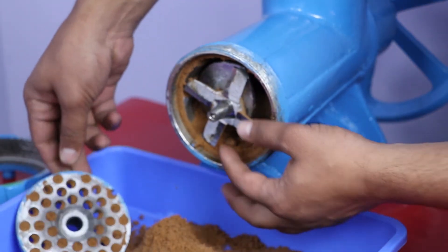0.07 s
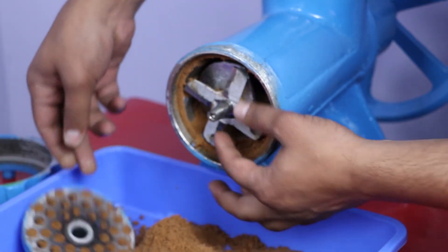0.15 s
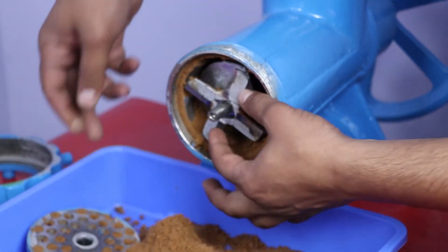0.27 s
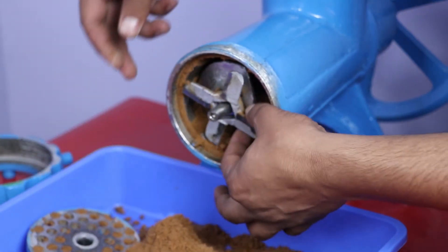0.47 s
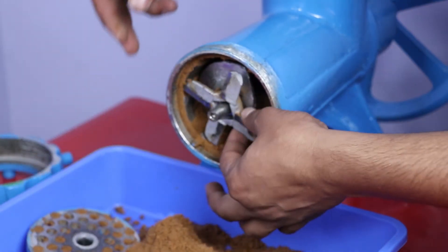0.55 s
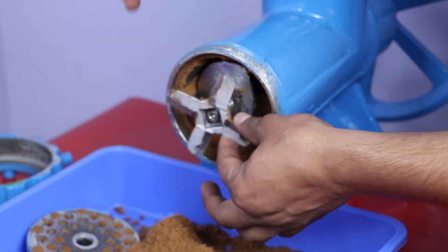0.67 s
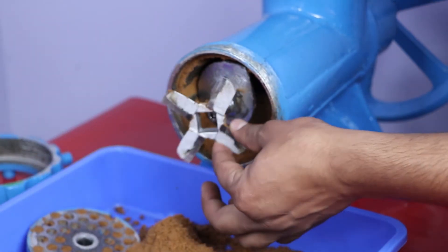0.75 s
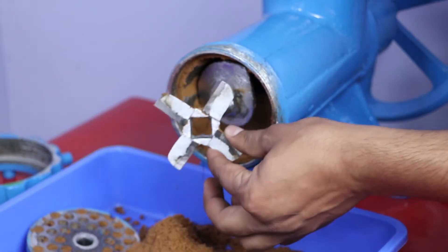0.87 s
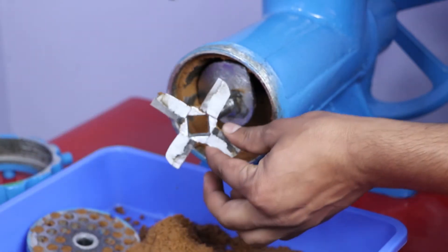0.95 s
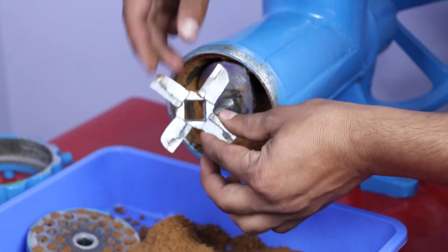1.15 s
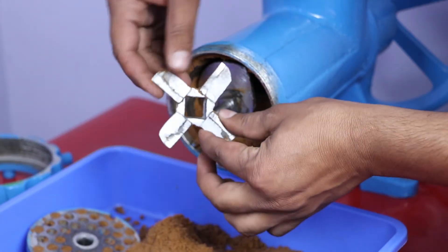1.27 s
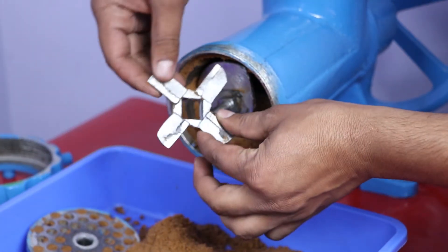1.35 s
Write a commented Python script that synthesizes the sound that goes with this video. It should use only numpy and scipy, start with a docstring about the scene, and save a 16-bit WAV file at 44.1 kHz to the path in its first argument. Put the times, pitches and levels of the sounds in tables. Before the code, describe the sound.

A steel grinder plate scrapes down a gritty plastic tub and lands with a hollow, booming thump. Crumbs settle, then a small blade clinks softly as it is worked loose, in a small, hard room with faint hiss.

```python
"""A meat grinder is taken apart in a small, hard room, over a faint hiss. First its perforated steel
plate scrapes down the gritty wall of a plastic tub, which rings faintly. Then the plate lands with
a hollow thump that booms on in the tub and the room. Crumbs settle, and last the cross knife
clinks softly as it is worked off its shaft."""
import sys
import numpy as np
from scipy import signal
from scipy.fft import rfft, irfft, next_fast_len
from scipy.io import wavfile
from scipy.ndimage import map_coordinates

SR = 44100
rng = np.random.default_rng(int(sys.argv[2]) if len(sys.argv) > 2 else 0)


def unload_wav(signal):
    """Save mono or channel-first audio to the path in sys.argv[1] as 16-bit WAV at rate SR, clipped to [-1, 1]."""
    wavfile.write(
        sys.argv[1],
        SR,
        np.round(np.clip(np.atleast_2d(signal).T, -1, 1) * 32767).astype(np.int16),
    )


N = 61739  # samples, 1.4 s


def amp(db):
    """Turn decibels into a number to multiply by."""
    return 10 ** (np.asarray(db) / 20)


def unit(x):
    """Scale x to an average (rms) strength of 1."""
    return x / np.sqrt(np.mean(x ** 2) + 1e-20)


def along(points, hz):
    """Read the value at hz from a curve through (frequency, value) points, on a log frequency axis."""
    freqs, values = np.transpose(points)
    return np.interp(np.log(hz + 1), np.log(freqs + 1), values)


def since(start):
    """Seconds since the start time, zero before it."""
    return np.maximum(np.arange(N) / SR - start, 0)


def fade(start, t60):
    """Hold at 1 until the start time, then fall by 60 dB every t60 seconds."""
    return amp(-60 * since(start) / t60)


def rise(start, rise_s):
    """Stay at 0 until the start time, then climb smoothly towards 1."""
    return 1 - np.exp(-since(start) / rise_s)


def filtered(x, response):
    """Multiply each frequency in x by response(hz)."""
    size = next_fast_len(N + SR // 2)
    return irfft(rfft(x, size) * response(np.fft.rfftfreq(size, 1 / SR)), size)[..., :N]


def coloured(x, spectrum):
    """Shape x with a curve of (f/Hz, level/dB) points, then scale it to strength 1."""
    return unit(filtered(x, lambda hz: amp(along(spectrum, hz))))


def spread(pair, width):
    """Mix two unrelated signals into left and right; more side level sounds wider."""
    def shares(hz):
        angle = np.arctan(amp(along(width, hz)))
        return np.array([np.cos(angle), np.sin(angle)])
    mid, side = filtered(pair, shares)
    return np.array([mid + side, mid - side])


def panned(x, left_db):
    """Lean x to one side; left_db is the left level minus the right."""
    return x * amp([[left_db / 2], [-left_db / 2]])


def grains(per_s=8000, spread_db=3.5):
    """Two dense streams of clicks: tiny slips of random size."""
    hits = rng.random((2, N)) < per_s / SR
    size_db = spread_db * np.clip(rng.standard_normal((2, N)), -2, 2)
    return hits * np.sign(rng.standard_normal((2, N))) * amp(size_db)


def wavering(hz, drift):
    """A slightly unsteady tone: its phase wanders by about drift radians."""
    t = since(0)
    wander = map_coordinates(rng.standard_normal(N // 1000), [t * 20])
    return np.sin(2 * np.pi * (hz * t + rng.random()) + drift * wander)


def ringing(tones, start):
    """Unsteady tones that die away from the start time."""
    return sum(amp(db) * fade(start, t60) * wavering(hz, drift=0.19) for hz, db, t60 in tones)


def lagging(force, t60):
    """How strongly a tone rings when pushed: it builds up late and lingers afterwards."""
    energy_kept = amp(-120 / (t60 * SR))  # from one sample to the next
    return np.sqrt(signal.lfilter([1 - energy_kept], [1, -energy_kept], force ** 2))


def struck(tones, start, hz, t60, attack_s):
    """A knock sets off an object's own tones, and each fades at its own rate."""
    phase = 2 * np.pi * hz * since(start)
    ring = sum(amp(db) * fade(start, t60 * life) * np.sin(phase * ratio) for ratio, db, life in tones)
    return ring * rise(start, attack_s)


def room(x):
    """The room's wash of echoes: it builds up, and the treble dies first."""
    # how long the echoes last: f/Hz, t60/s
    echo_t60 = [(100, 0.87), (400, 0.7), (1000, 0.69), (2500, 0.4), (6000, 0.37), (14000, 0.18)]
    # stereo width of the echoes: f/Hz, side level/dB
    width = [(100, -18), (220, -13.5), (400, -9), (800, -7.5), (1400, -1.5), (3000, 3), (15000, -7)]
    hz, t, bands = signal.stft(rng.standard_normal((2, N)), SR, nperseg=256)
    bands *= amp(-60 * t / along(echo_t60, hz)[:, None])
    tail = signal.istft(bands, SR, nperseg=256)[1][:, :N]
    tail = spread(tail, width) * rise(0, rise_s=0.0054)
    tail /= np.linalg.norm(tail[0])
    return signal.fftconvolve(np.atleast_2d(x), tail, axes=1)[:, :N]


def background():
    """Quiet room rumble and a faint hiss, there from start to end."""
    # tone colour of rumble and hiss: f/Hz, relative level/dB
    colour = [(15, -33), (25, -14.5), (53, 0.5), (75, -13.5), (113, -12), (140, -8.5), (246, -16),
              (297, -11.5), (567, -15), (1240, -19.5), (1340, -20), (3260, -26), (4620, -31.5), (9050, -27),
              (15500, -36.5)]
    # their stereo width: f/Hz, side level/dB
    width = [(50, -8), (200, -6), (1000, 0.5), (15000, -1)]
    return amp(-53.5) * coloured(spread(rng.standard_normal((2, N)), width), colour)


def plate_slide():
    """Tiny slips over grit shake plate and tub; the faster the slide, the louder and brighter."""
    # strength of the rubbing as the plate slides: t/s, relative level/dB
    slide = [(0, -29.5), (0.03, -36.5), (.042, -28), (0.054, -31.5), (0.076, -39), (0.134, -42.5),
             (0.146, -31), (0.169, -28.5), (0.194, -30.5), (0.216, -24.5), (0.234, -16.5), (0.245, -23.5),
             (0.254, -18), (0.26, -20)]
    # tone colour of the dull part of the rubbing: f/Hz, relative level/dB
    body_colour = [(60, -34), (200, -16), (330, -10.5), (520, -0.5), (800, -6), (1400, -2), (2100, -5.5),
                   (2700, -9.5), (3600, -12), (4800, -20), (15000, -28)]
    # tone colour of the bright grit: f/Hz, relative level/dB
    grit_colour = [(500, -4.5), (2500, -24), (3600, 2.5), (4900, -8.5), (6500, -1), (8000, -1.5),
                   (10500, -8.5), (15500, -24)]
    # tones of plate and tub that sing under the rubbing: f/Hz, relative level/dB, t60/s
    tones = [(405, -20, .1), (574, -11, .12), (635, -12, .12), (735, -13, .12), (900, -19, .15),
             (1140, -14, .2), (1170, -18, .15), (1318, -14, .15), (1478, -15, .12), (1594, -13, .15),
             (1836, -12, .12), (2078, -18, .1), (2345, -17, .1), (3340, -19, .05), (3500, -23, .05),
             (3950, -21, .05)]
    # stereo width of the rubbing: f/Hz, side level/dB
    width = [(100, -36), (600, -8.5), (1300, -9), (2400, 0), (4400, -2.5), (8000, 1.5), (15000, 6)]
    times, levels = np.transpose(slide)
    level_db = np.interp(since(0), times, levels)
    level_db -= 60 * since(times[-1]) / 0.01  # the rubbing dies within 0.01 s as the plate lands
    grit_db = levels.max() + 1.21 * (level_db - levels.max())  # swings wider than the dull part
    body = amp(level_db - 3) * coloured(spread(grains(), width), body_colour)
    grit = amp(grit_db - 9) * coloured(spread(grains(), width), grit_colour)
    singing = np.zeros((2, N))
    for hz, db, t60 in tones:
        pair = np.array([wavering(hz, drift=0.4) for _ in range(2)])
        singing += amp(db - 1.5) * lagging(amp(level_db), t60) * pair
    rubbing = body + grit + spread(singing, width)
    return rubbing + amp(-8) * room(rubbing)


def tub_ring():
    """The first rubbing sets the tub ringing faintly."""
    # the tub's own tones: f/Hz, level/dB, t60/s
    tones = [(157, -47, 0.76), (196, -40, 0.71), (266, -41, 0.35), (472, -39, 0.2), (765, -40, 0.37),
             (891, -36.5, 0.23), (1405, -35, 0.25), (1575, -40, .3), (2450, -38, 0.12), (3520, -40.5, 0.12)]
    return ringing(tones, start=0)


def plate_landing():
    """The plate pushes the tub's floor down: a short thump, then a low boom builds up."""
    # the plate lands and rocks over: t/s, level/dB, f/Hz, t60/s
    landings = [(.2613, -.7, 422, .028), (.2663, -10, 490, .033)]
    # tones of the tub's floor under the blow: pitch ratio, relative level/dB, t60 ratio
    floor_tones = [(1, 0, 1), (.54, -16, 1.5), (.37, -21, 1.5), (1.35, -21, 1.6), (3.45, -23, 1.2)]
    # booming tones of the tub and the room: f/Hz, relative level/dB, t60/s
    boom_tones = [(100.6, -44, 1.64), (157, -24.5, 0.41), (177, -27, 0.47), (203, -21.5, 0.51),
                  (242.1, -19.5, 0.26), (308, -19.5, 0.6), (365, -23.5, 0.48), (389.8, -25.5, .36),
                  (420.4, -22.5, .42), (443.6, -19, 0.43), (478.4, -25, 0.24), (519, -21, 0.3),
                  (589.5, -35.5, 0.31), (604, -38.5, 0.69), (666, -30, 0.41)]
    bass_cut_hz = 125  # the small tub gives off little sound below this
    wall_delay_s = 0.028  # the thump comes back from the far wall
    push = -sum(amp(db) * struck(floor_tones, start, hz, t60, attack_s=0.00012)
                for start, db, hz, t60 in landings)
    thump = filtered(push, lambda hz: hz ** 4 / (hz ** 4 + bass_cut_hz ** 4))
    landed = landings[0][0]
    boom = amp(1) * ringing(boom_tones, landed) * rise(landed, rise_s=0.019) ** 2
    echo = filtered(thump, lambda hz: np.exp(-2j * np.pi * hz * wall_delay_s))
    return thump + boom + amp(-11) * room(echo)


def crumbs():
    """Crumbs settle in the tub with a bright tick and a brief sprinkle."""
    # falls of crumbs: t/s, level/dB, t60/s
    falls = [(0.318, -35.5, 0.023), (0.323, -42, 0.069)]
    # their tone colour: f/Hz, relative level/dB
    colour = [(1000, -16), (5000, -3), (8500, 0), (12000, -4), (15500, -7)]
    loudness = sum(amp(db) * fade(start, t60) * (since(start) > 0) for start, db, t60 in falls)
    sprinkle = loudness * coloured(grains(), colour)
    return sprinkle + amp(-3.5) * room(sprinkle)


def knife():
    """The steel knife clinks, muffled by the fingers that hold it; each touch also scrapes a little."""
    # light touches on the shaft and barrel: t/s, level/dB, main f/Hz, base t60/s
    touches = [(.358, -27, 2410, 0.086), (0.386, -25.5, 940, 0.053), (.616, -36, 997, 0.059),
               (1.283, -59.5, 9060, 0.13)]
    # the knife's own tones: pitch ratio, relative level/dB, t60 ratio
    tones = [(1, 2.5, 0.41), (.945, -9, 2.18), (0.16, -7, 0.24)]
    attack_s, scrape_width = 0.0027, 0.18  # width to each side, as a share of the pitch
    clinks = np.zeros((2, N))
    for start, db, hz, t60 in touches:
        noise = unit(filtered(grains(), lambda f: 1 / (1 + ((f - hz) / (scrape_width * hz)) ** 2)))
        scrape = amp(-8) * fade(start, t60) * rise(start, attack_s) * noise
        clinks += amp(db) * (struck(tones, start, hz, t60, attack_s) + scrape)
    return clinks + amp(-8.5) * room(clinks)


def scene():
    """Add up all the sounds, a little to the right."""
    small_sounds = plate_slide() + tub_ring() + crumbs() + knife() + background()
    return panned(small_sounds, left_db=-1.74) + panned(plate_landing(), left_db=-1.5)


def record(dry):
    """Cut away the very highest treble."""
    return filtered(dry, lambda hz: hz < 15750)


dry = scene()
out = record(dry)
unload_wav(out)
```